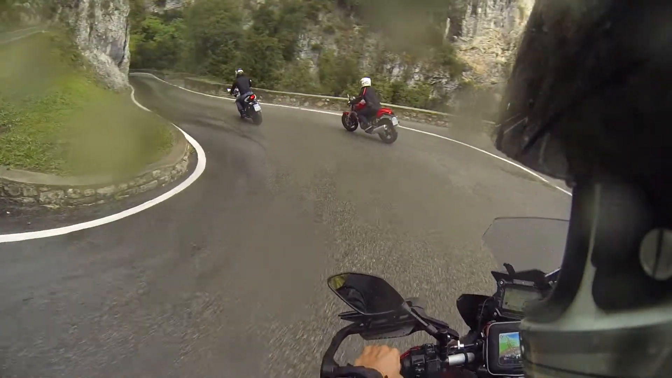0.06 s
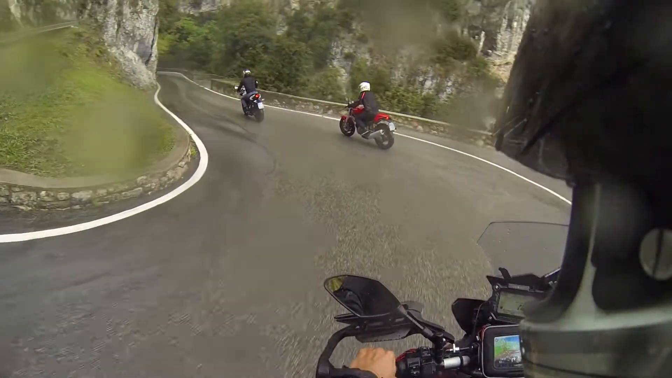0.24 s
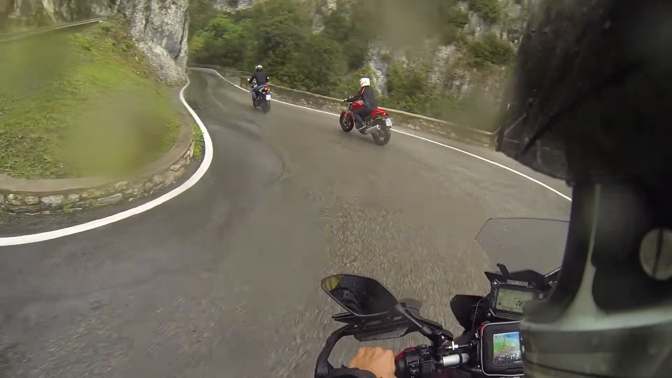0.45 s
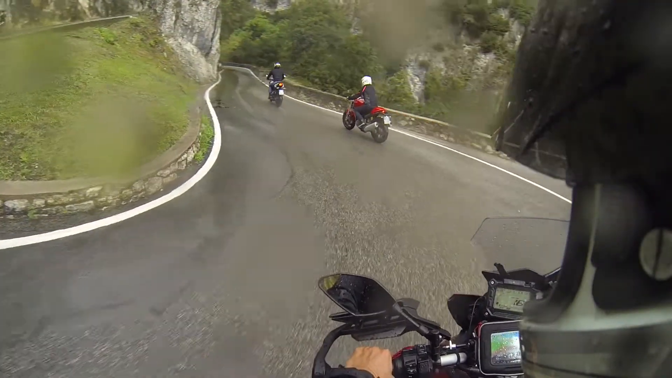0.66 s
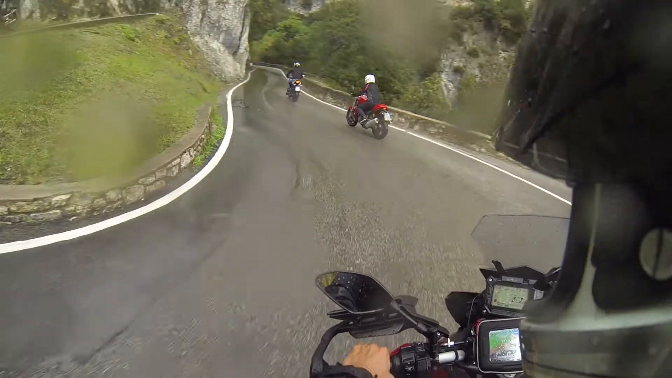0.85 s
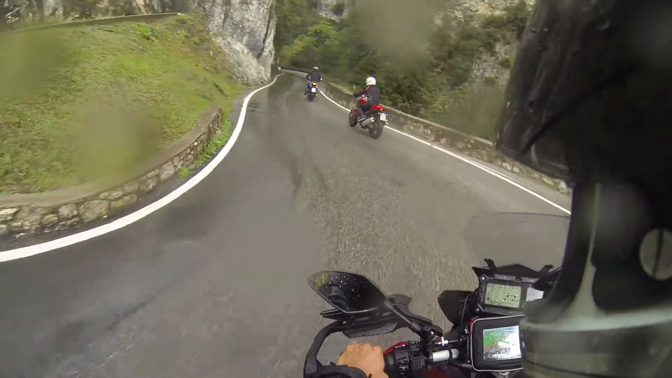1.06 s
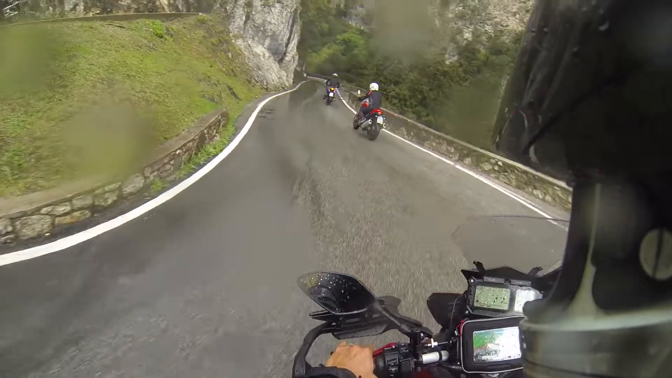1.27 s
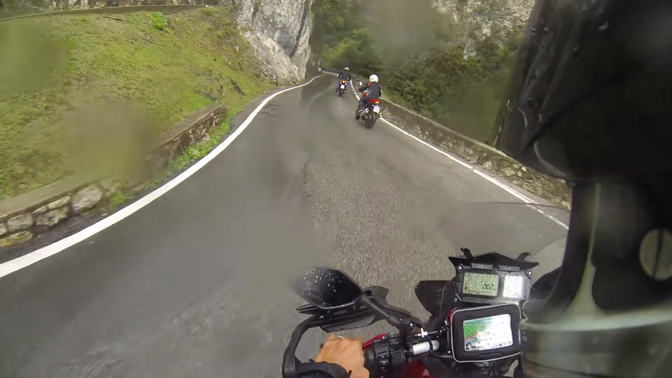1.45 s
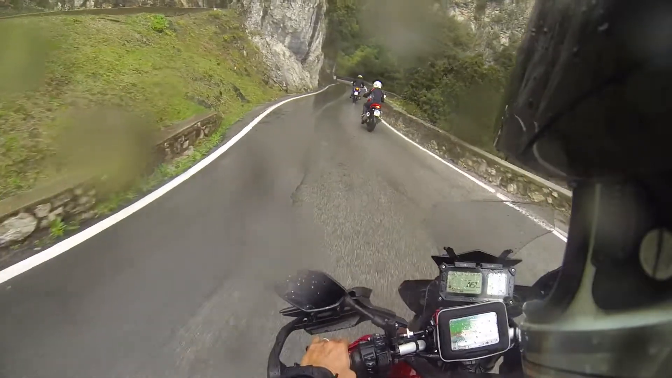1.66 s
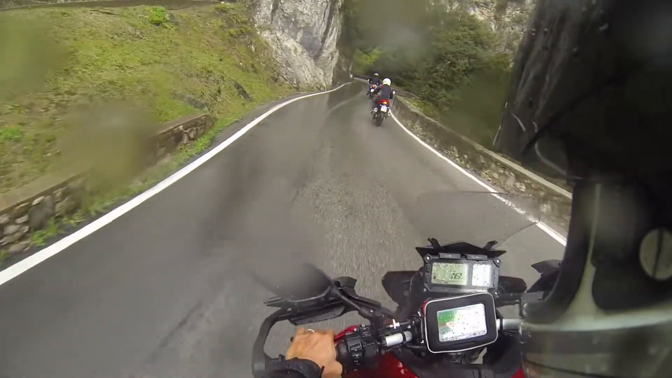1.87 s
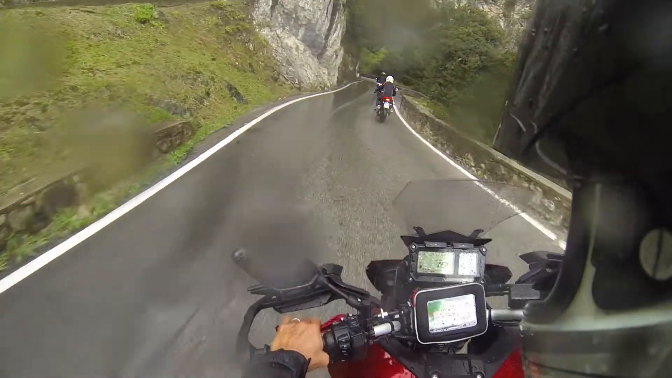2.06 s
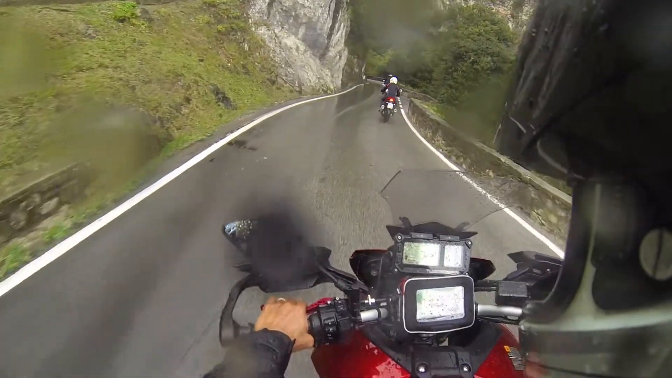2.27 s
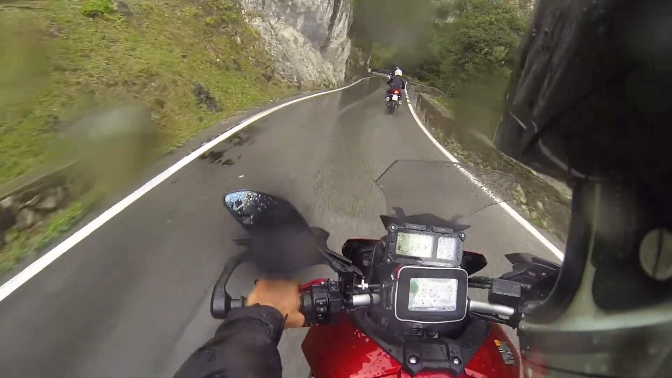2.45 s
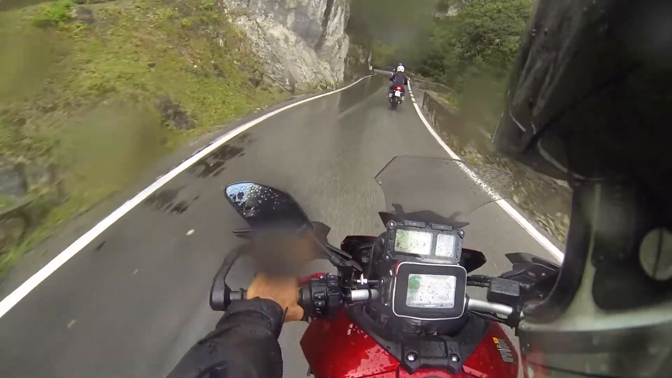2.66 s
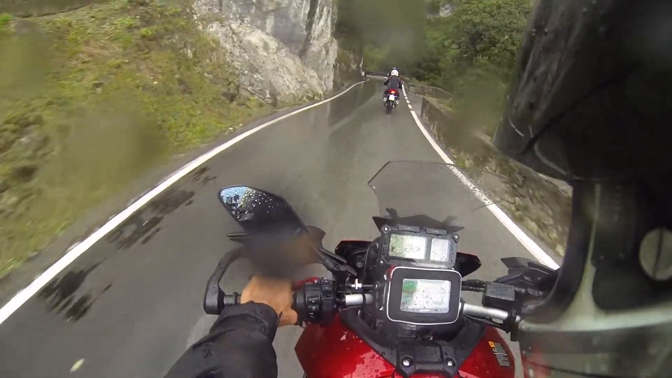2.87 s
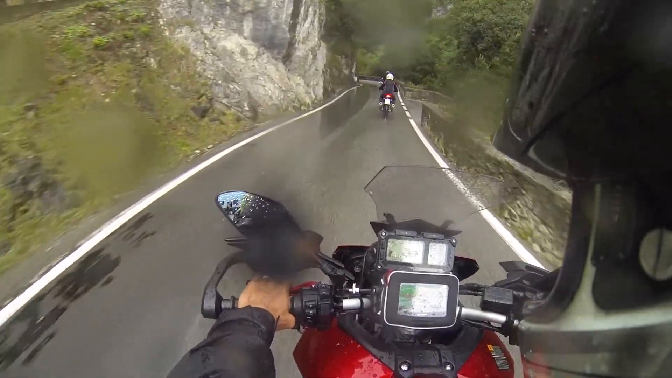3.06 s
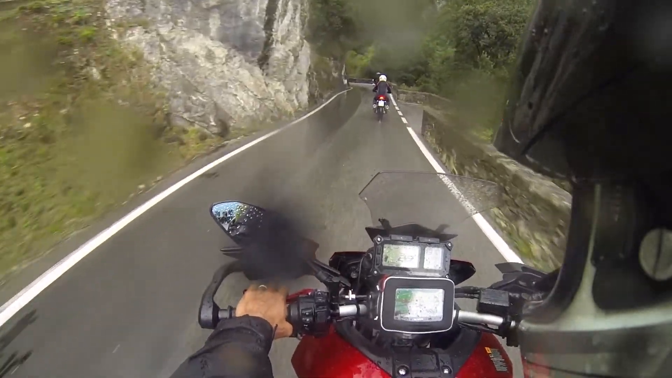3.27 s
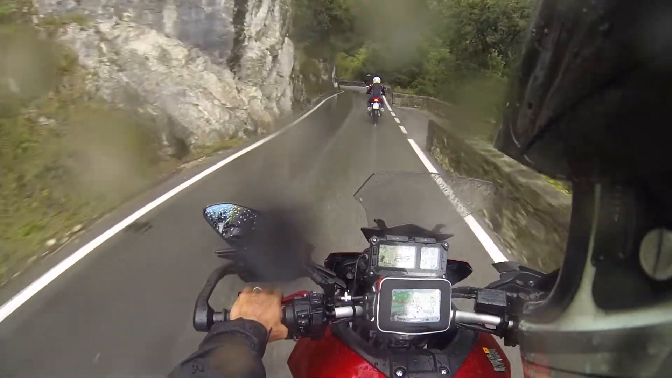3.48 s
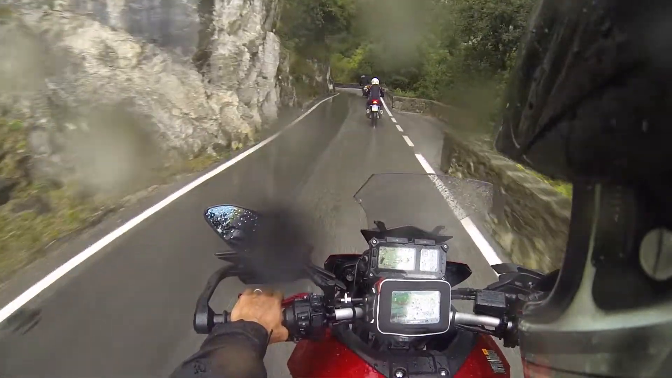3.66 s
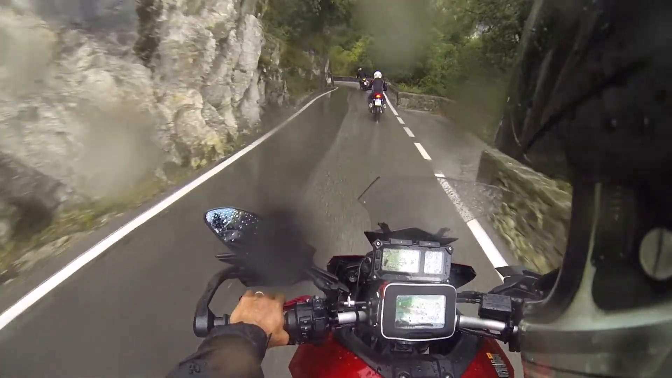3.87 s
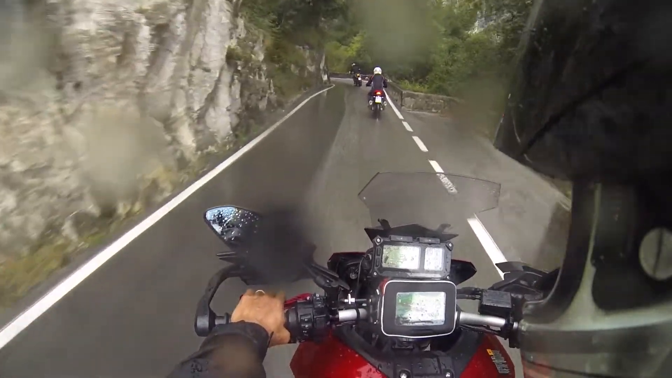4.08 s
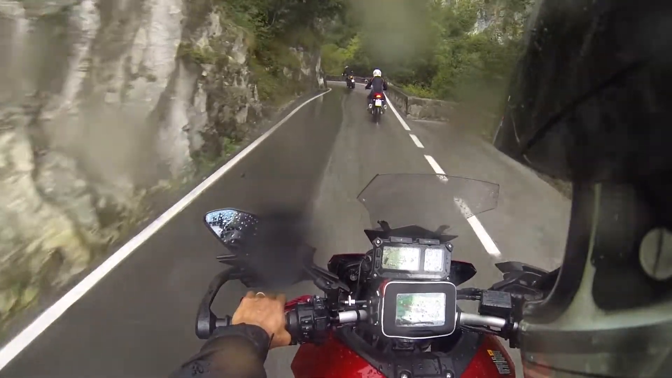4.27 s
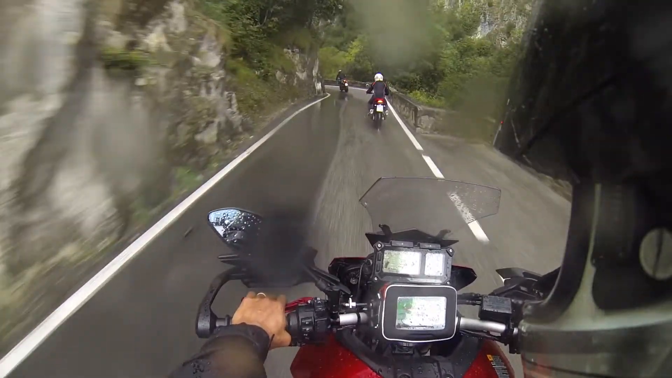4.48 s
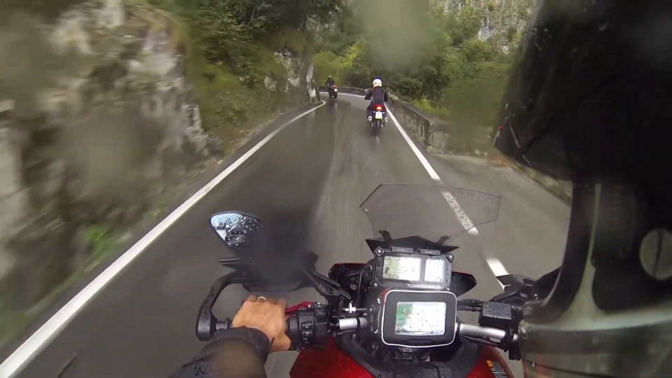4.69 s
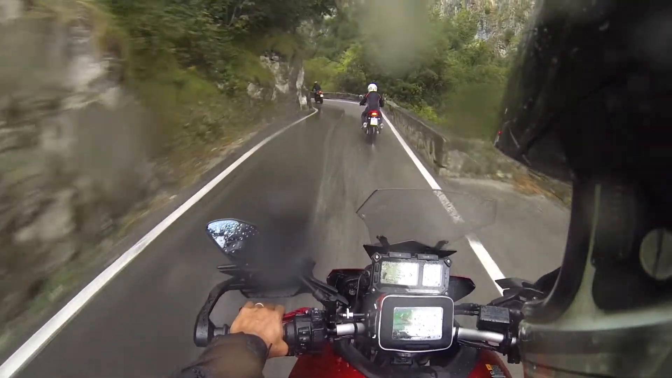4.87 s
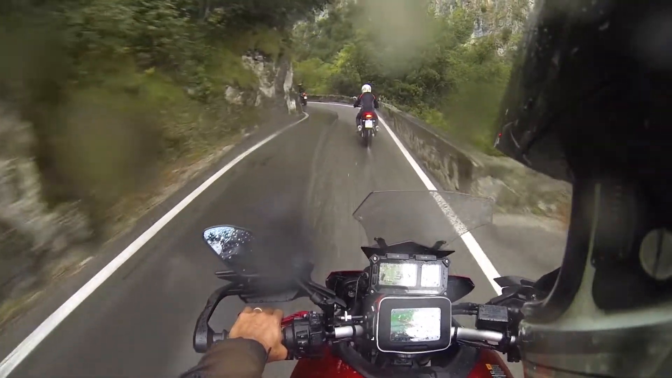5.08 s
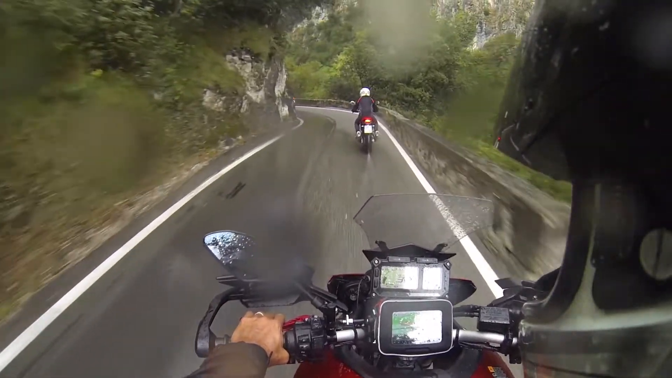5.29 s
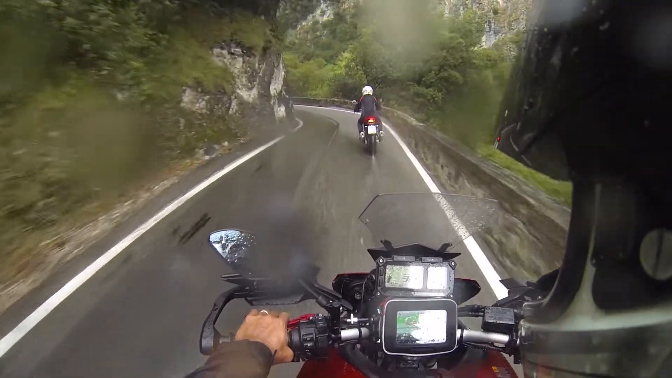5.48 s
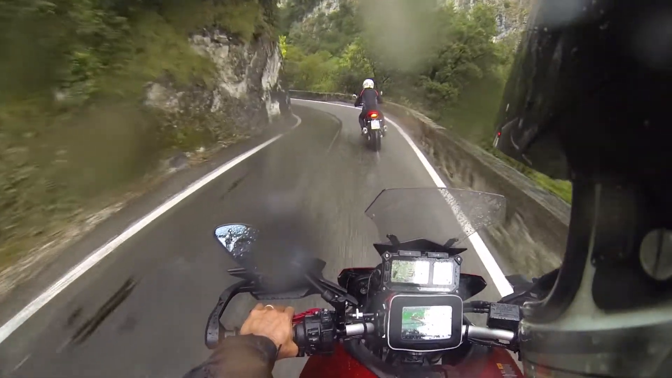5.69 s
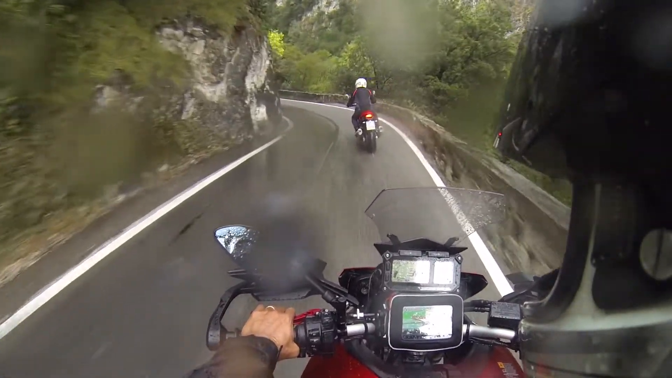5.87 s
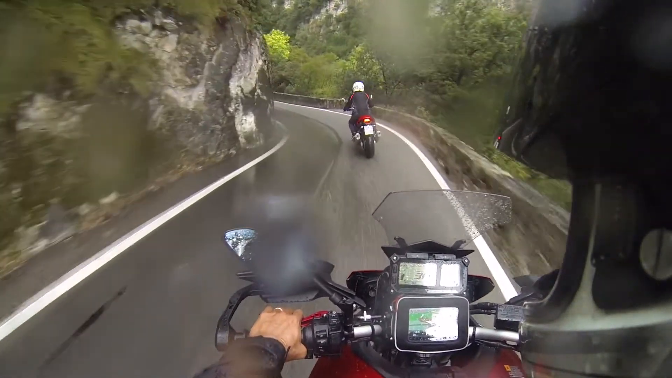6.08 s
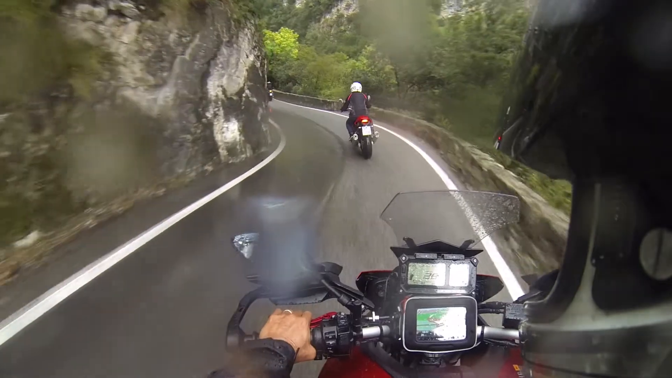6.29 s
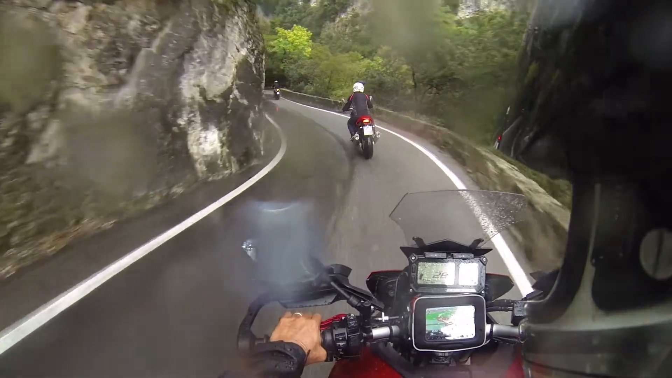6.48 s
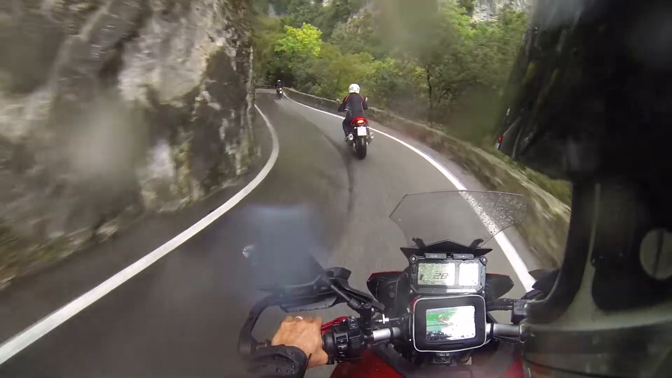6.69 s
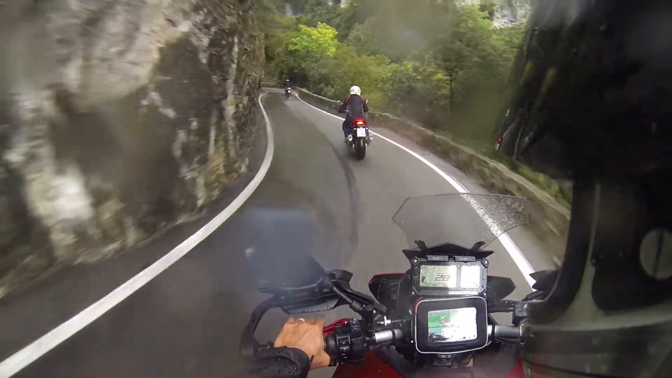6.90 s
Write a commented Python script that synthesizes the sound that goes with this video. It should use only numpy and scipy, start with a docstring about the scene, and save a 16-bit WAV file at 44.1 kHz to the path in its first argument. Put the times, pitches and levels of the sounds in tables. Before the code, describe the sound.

Throaty motorcycle acceleration with gear whine and steady wet-tyre hiss, soon overtaken by thumping wind roar and sharp, irregular raindrop clicks close up.

```python
"""An engine climbs hard as a motorcycle accelerates out of a bend on a wet road, heard at the rider's helmet.
Exhaust harmonics and a gear whine follow one crankshaft, over a noise hiss from tyres and machinery.
They sink under wind: shaped noises that buffet the helmet, and rush and sizzle round a camera on it.
Raindrops smack the camera's waterproof case as short bursts of ringing modes; the case also colours
the tyre hiss and the rush of air. A faint electronic whistle lies behind."""
import sys
import numpy as np
from scipy import signal
from scipy.fft import rfft, irfft
from scipy.io import wavfile
from scipy.ndimage import uniform_filter1d

SR = 44100
rng = np.random.default_rng(int(sys.argv[2]) if len(sys.argv) > 2 else 0)


def wrap_up_sound(samples):
    """Save the sound to the file named by the first command line argument, as 16-bit audio."""
    columns = np.atleast_2d(samples).T
    # keep every value between -1 and 1, then stretch to whole-number steps
    tamed = np.clip(columns, -1, 1)
    steps = np.round(tamed * 32767).astype(np.int16)
    wavfile.write(sys.argv[1], SR, steps)


N = 306054
T = np.arange(N) / SR  # time of every sample, s
HZ = np.fft.rfftfreq(N, 1 / SR)  # frequency of every spectrum bin

# Load on the engine. Each row: time in seconds, level in dB.
THROTTLE = [(0, 1), (.72, -2), (1.1, -6.5), (1.7, -9.5), (6.94, -6)]
# Exhaust note. Each row: multiple of the crank speed, level in dB at 0 dB throttle before the pipe.
EXHAUST = [(1, -62), (1.25, -49.5), (1.5, -53.5), (2, -53), (3, -57.5), (4, -61), (5.002, -65)]
# Standing waves in the exhaust. Each row: centre in Hz, half width in Hz, boost in dB.
PIPE = [(144.3, 6.9, 5), (174.6, 3.6, 8), (336, 10, 8)]


def engine(crank_hz, crank_turns, throb=0.25):
    """Exhaust harmonics throb with uneven firing and swell as they sweep through the pipe's resonances."""
    note = 0
    for multiple, db in EXHAUST:
        pipe_db = humps(PIPE, multiple * crank_hz)
        swell = amp(db + pipe_db) * (1 + throb * wander(11))
        start_turn = rng.random()
        note = note + swell * np.sin(2 * np.pi * (multiple * crank_turns + start_turn))
    return np.sqrt(2) * amp(curve(THROTTLE)) * note


# Loudness of the gear whine. Each row: time in seconds, level in dB.
WHINE_LEVEL = [(0, -57), (.3, -53), (.55, -56.5), (.9, -51), (1.5, -56.5), (2.2, -65), (6.94, -72)]


def gears(crank_turns, mesh=31, blur_hz=9, sideband_db=-4.5):
    """Meshing teeth: a whine of many close strands, one camshaft turn (half the crank speed) apart."""
    whine = 0
    for offset in np.arange(-10, 11) / 2:  # in crank speeds from the mesh tone
        strand = np.cos(2 * np.pi * (mesh + offset) * crank_turns)
        whine = whine + amp(sideband_db * abs(offset)) * wander(blur_hz) * strand
    return amp(curve(WHINE_LEVEL)) * unit(whine)


# Spectrum of the hiss before the case. Each row: frequency in Hz, relative level in dB per Hz.
TYRES = [(100, 4), (230, -3.5), (450, -14.5), (590, -12), (650, -9.5), (780, -16), (870, -11.5),
         (915, -5.5), (1000, -14), (2000, -12.5), (3000, -10.5), (4700, -22.5), (6000, -30), (14000, -41.5),
         (15000, -54)]
# Colour of the camera case. Each row: centre in Hz, half width in Hz, boost or dip in dB.
CASE = [(353.6, 16.5, 7), (771.4, 12.6, 6.5), (1228, 144, 8.5), (1526, 269, 11), (1890, 46, -9.5),
        (2160, 79, 1.5), (3979, 180, -4), (5060, 360, 4), (7480, 780, 5), (13400, 448, 5.5)]


def tyres(crank_turns, level_db=-46.0, clatter=0.029, flicker_db=0.98):
    """Steady hiss of wet tarmac and machinery, flickering slightly and pulsing a little with the crank."""
    pulse = 1 + clatter * np.cos(2 * np.pi * crank_turns)
    hiss = noise(shape(TYRES) + humps(CASE, HZ))
    return amp(level_db + flicker_db * wander(21)) * pulse * hiss


# Air streaming past the case. Each row: time in seconds, level in dB re cruising on the straight.
AIRFLOW = [(0, -15.5), (1.55, -15.5), (1.75, -11), (2.48, -11.5), (2.8, -4), (3.55, 0), (4.5, 0),
           (4.9, 1.5), (5.8, -2), (6.4, -5), (6.82, -0.5)]
# Brief gusts and lulls in it. Each row: centre in seconds, length in seconds, change in dB.
GUSTS = [(3.417, 0.062, -5), (3.683, 0.14, 5.5), (4.171, 0.081, 8.5), (4.762, 0.25, 3), (5.517, 0.1, -2.5),
         (5.639, 0.21, 3)]


def airflow(growth, gust_share):
    """Wind level in dB as one layer feels it: the steady airflow plus its gusts, each scaled."""
    gusts_db = sum(db * bell(s, length) for s, length, db in GUSTS)
    return growth * curve(AIRFLOW) + gust_share * gusts_db


def turbulent(level_db, onset_db):
    """Gain of a wind noise that sets in above a threshold; below it only a faint floor is left."""
    onset_power = amp(onset_db) ** 2
    return np.sqrt(np.maximum(amp(level_db) ** 2 - onset_power, 0.047 * onset_power))


# Helmet buffeting, setting in as the bike straightens up. Each row: time in seconds, level in dB.
BUFFETING = [(0, -41.5), (.7, -39.5), (1.28, -44), (2.12, -31.5), (2.42, -38), (2.62, -25), (4.75, -24),
             (5.6, -24.5), (6.05, -30), (6.85, -25)]
# Single heavy buffets. Each row: centre in seconds, dB above the rest.
HEAVES = [(2.84, 5.5), (3.7, 4.5), (4.39, 6), (4.69, 8), (4.901, 5), (5.78, 7), (6.26, 4.5)]
# Spectrum of the thumps. Each row: frequency in Hz, relative level in dB per Hz.
BUFFET = [(10, -45), (20, -4.5), (29, 2), (37, -4), (47, -15), (66, -6.5), (78, -8.5), (95, -18),
          (125, -22.5), (400, -100)]
# Spectrum of the roar. Each row: frequency in Hz, relative level in dB per Hz.
ROAR = [(50, -19), (85, -17), (115, 1.5), (200, -9), (300, -15), (1500, -68)]


def buffeting(eddies, roar_db=-40, onset_db=-8.5, eddy_db=2, growth=0.56, gust_share=0.99, heave_s=0.1):
    """Vortices shed by the helmet thump the case, with a low roar as well."""
    heaves_db = sum(db * bell(s, heave_s) for s, db in HEAVES)
    thumps = steadied(noise(shape(BUFFET)), 0.152) * amp(curve(BUFFETING) + heaves_db)
    roar = steadied(noise(shape(ROAR)) * amp(eddy_db * eddies), 0.13)
    roar = roar * turbulent(airflow(growth, gust_share), onset_db)
    return thumps + amp(roar_db) * roar


# Spectrum of the rush before the case. Each row: frequency in Hz, relative level in dB per Hz.
RUSH = [(100, -15), (230, -2), (400, -0.5), (600, -11), (1000, -5.5), (3000, -12), (4500, -23), (6000, -35),
        (9000, -43), (12500, -51), (14500, -68)]


def air_rush(eddies, level_db=-34.0, onset_db=-15.0, eddy_db=1.25, patch_db=2.54, gust_share=0.44):
    """Turbulent air rushes round the case in duller and brighter flurries."""
    colour = shape(RUSH) + humps(CASE, HZ)
    octaves = np.log2(np.maximum(HZ, 200) / 1500)
    flurries = 0
    for tilt in (-1, 1):  # dB per octave: duller, then brighter
        flurries = flurries + noise(colour + tilt * octaves) * amp(patch_db * wander(36))
    rush = unit(flurries * amp(eddy_db * eddies))
    return turbulent(airflow(0.96, gust_share), onset_db) * amp(level_db) * rush


# Spectrum of the sizzle. Each row: frequency in Hz, relative level in dB per Hz.
SIZZLE = [(7000, -30), (9800, -16), (10800, -11), (11400, -2.5), (12200, -12), (12800, -16), (15000, -40)]


def sizzle(eddies, level_db=-66, onset_db=-13, eddy_db=1.7, spit_db=10.5, growth=1.65, gust_share=0.99):
    """Air catching an edge of the case spits on and off, ringing a narrow band in the top octave."""
    on_off = np.tanh(wander(150) - .8)
    spits = rng.standard_normal(N) * amp(eddy_db * eddies + spit_db * on_off)
    ringing = unit(irfft(rfft(spits) * amp(shape(SIZZLE)), N))
    return turbulent(airflow(growth, gust_share), onset_db) * amp(level_db) * steadied(ringing, 0.187)


# How a blow is shared among thud, shell ring, smack and fine spatter, one row for each.
# Each row: base level in dB, dB per dB of strength, dB per dB of sharpness.
DROP_PARTS = [(-37, 1, 0), (-36, 1, -0.57), (-43, 0.69, 0.29), (-56, 1.46, .5)]


def blow(strength_db, sharpness_db, thud_db):
    """Levels of a drop's four parts: hard drops spatter more, sharp ones smack rather than ring."""
    levels_db = np.array([db + growth * strength_db + tilt * sharpness_db
                          for db, growth, tilt in DROP_PARTS])
    levels_db[0] += thud_db
    return levels_db


# What a drop rings: one list of modes for each of those four parts.
# Each row: frequency in Hz, relative level in dB, time to decay by 60 dB in seconds.
DROP_MODES = [
    [(363.5, 3, 0.04), (460.6, -10, 0.0061)],
    [(790, -14, .012), (960, -11, .01), (1310, -8, .012), (1560, 0, .013)],
    [(2105, 2, 0.02), (2695, 8, .009), (3230, -2.5, 0.013), (3566, 2, 0.014)],
    [(4300, 4.5, 0.012), (5600, 3, 0.01), (6400, 6, 0.009)],
]


def drop(levels_db, splash_s=0.0019, splash=0.16, build_s=0.00034, detune=0.021):
    """A drop lands and bursts; the case's ring builds as the water spreads, and dies within milliseconds."""
    t = np.arange(SR // 16) / SR
    force = splash * rng.standard_normal(len(t)) * np.exp(-t / splash_s)
    force[0] += 1  # the impact itself
    sound = 0
    for modes, level_db in zip(DROP_MODES, levels_db):
        ring = 0
        for k, (hz, db, t60) in enumerate(modes):
            tone = np.sin(2 * np.pi * hz * rng.normal(1, detune) * t)
            ring = ring + (-1) ** k * amp(db - 60 * t / t60) * tone
        ring = signal.fftconvolve(force, ring * (1 - np.exp(-t / build_s)))[:len(t)]
        # 0 dB holds the energy of 10 ms at rms 1
        sound = sound + amp(level_db) * ring * np.sqrt(SR / 100) / np.linalg.norm(ring)
    return sound


# Big raindrops on the case.
# Each row: start in seconds, strength in dB, sharpness in dB, extra level of the thud in dB.
DROPS = [(1.724, -8.5, -1, 5), (1.735, -4.5, -8, 2), (1.814, -16, 14, -12), (2.158, -10, 13, -5),
         (2.193, -7.5, 14, 2), (2.274, -6.5, -1, -7), (2.291, -4.5, 3, -2), (2.356, -1.5, -2, -2),
         (2.721, -7, 13, 0), (3.002, 1, -3, -16), (3.091, 2.5, 1, -21), (3.18, -5, -5, -6),
         (3.2617, 9.5, -9, -15), (3.288, 0, -3, -2), (3.292, -2, 10, -3), (3.416, -3, -8, -9),
         (3.475, 0.5, -6, -5), (3.553, -3, -2, -4), (3.862, 4, 8, -4), (3.9903, 8, 4, -6),
         (3.9935, 4.5, 7, 2.5), (4.0038, 8, -13.5, 3.5), (4.033, 1, 6, -12), (4.091, 0, 3, -14),
         (4.12, 1.5, 13, 1), (4.191, 7, -4, -7), (4.732, 4, 1, -2), (4.847, 5.5, -6, -14),
         (5.038, 8.5, -4, -11), (5.738, 3.5, -2, -9), (6.197, 3.5, 11, -5.5), (6.241, 1.5, -1, -1),
         (6.402, 4, -4, -14), (6.479, -9, -13, -8), (6.707, 2.5, -10, -15)]


def rain(small_db=-11, spread_db=2.5, sharp_db=2, sharp_spread_db=5, small_thud_db=-7,
         scatter_s=.09, droplet_db=-7, count=170):
    """Big drops trailed by droplets, and a patter of small ones, denser and harder as the airflow grows."""
    out, wind_db = np.zeros(N), curve(AIRFLOW)
    swept = np.cumsum(amp(wind_db))  # rain met so far

    def small_drop(s, size_db):
        """A lesser drop, each with its own sharpness."""
        strength_db = np.interp(s, T, wind_db) + size_db
        sharpness_db = sharp_db + sharp_spread_db * rng.standard_normal()
        add(out, s, drop(blow(strength_db, sharpness_db, small_thud_db)))

    for s, strength_db, sharpness_db, thud_db in DROPS:
        add(out, s, drop(blow(strength_db, sharpness_db, thud_db)))
        for delay in scatter_s * rng.random(2) ** 2:  # most droplets follow closely
            small_drop(s + delay, droplet_db)
    for when, size in rng.random((count, 2)):
        s = np.interp(when * swept[-1], swept, T)
        small_drop(s, small_db + spread_db * min(-np.log(size), 3))  # a few are much harder
    return out


def camera_whistle(hz=10645, level_db=-79):
    """A faint tone from the camera's electronics, steady but for a slight drift of phase."""
    return np.sqrt(2) * amp(level_db) * np.sin(2 * np.pi * hz * T + .3 * wander(30))


def amp(db):
    """Decibels to gain."""
    return 10 ** (np.asarray(db) / 20)


def unit(x):
    """Scales to rms 1."""
    return x / np.sqrt(np.mean(x ** 2) + 1e-20)


def curve(rows):
    """The second column of a time table, at every sample."""
    rows = np.asarray(rows)
    return np.interp(T, rows[:, 0], rows[:, 1])


def add(mix, s, sound):
    """Mixes a sound in at time s."""
    part = mix[max(round(s * SR), 0):][:len(sound)]
    part += sound[:len(part)]


def noise(db):
    """Noise of rms 1 with the given relative level at each frequency."""
    return unit(irfft(rfft(rng.standard_normal(N)) * amp(db), N))


def shape(points):
    """A spectrum table joined on a log-frequency axis."""
    hz, db = np.transpose(points)
    return np.interp(np.log(HZ + 1), np.log(hz), db)


def humps(resonances, at_hz):
    """The rise or dip in dB that a set of resonances gives at each frequency."""
    return sum(db * np.exp(-((at_hz - hz) / width) ** 2) for hz, width, db in resonances)


def wander(hz):
    """Random motion of rms 1, mostly slower than hz."""
    return noise(-20 * np.log10(1 + (HZ / hz) ** 4))


def steadied(x, seconds):
    """Evens out the slow swells of a noise, leaving its single lumps."""
    power = uniform_filter1d(x ** 2, int(seconds * SR))
    return x / np.sqrt(abs(power) + 1e-3)


def bell(s, length):
    """A smooth swell from 0 to 1 and back, centred on time s."""
    return np.exp(-(2 * (T - s) / length) ** 2)


# Crankshaft speed. Each row: time in seconds, turns per second.
CRANK = [(0, 68), (.28, 73), (.6, 85), (.8, 88.7), (1.1, 92.5), (1.6, 89.4), (6.94, 84)]


def scene():
    """Bike, wind and rain at the helmet; one crank drives the bike, the same eddies stir every wind layer."""
    crank_hz = curve(CRANK) * (1 + 0.00317 * wander(11))  # slightly unsteady
    crank_turns = np.cumsum(crank_hz) / SR
    eddies = unit(wander(7.3) + wander(80))
    bike = engine(crank_hz, crank_turns) + gears(crank_turns) + tyres(crank_turns)
    wind = buffeting(eddies) + air_rush(eddies) + sizzle(eddies)
    return (bike + wind + rain() + camera_whistle())[None]


def record(dry, edge_hz=15000):
    """The camera's band limit: a steep lowpass."""
    lowpass = signal.firwin(511, edge_hz, window=("kaiser", 9), fs=SR)
    return signal.oaconvolve(dry, lowpass[None], "same")


dry = scene()
out = record(dry)
wrap_up_sound(out)
```